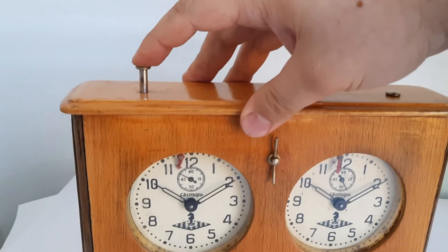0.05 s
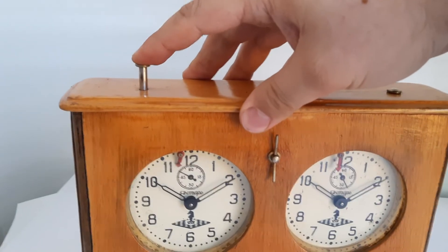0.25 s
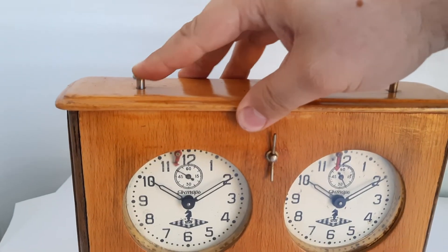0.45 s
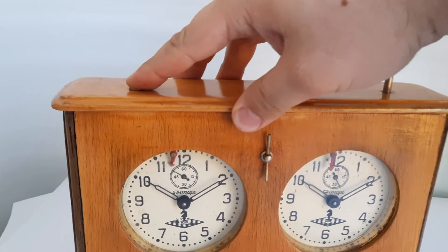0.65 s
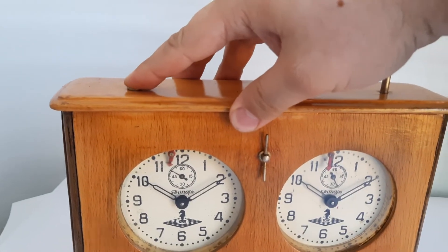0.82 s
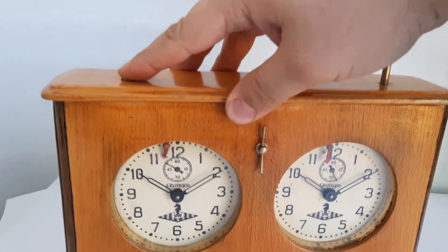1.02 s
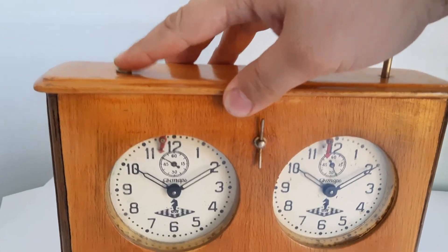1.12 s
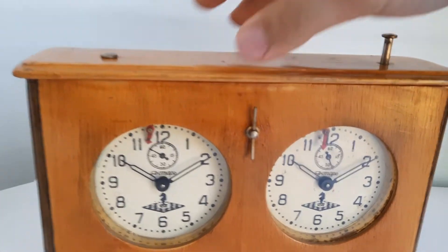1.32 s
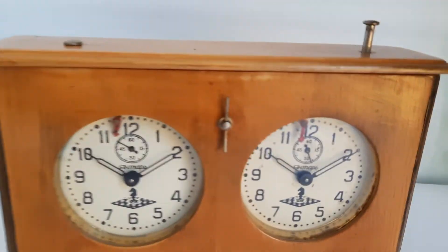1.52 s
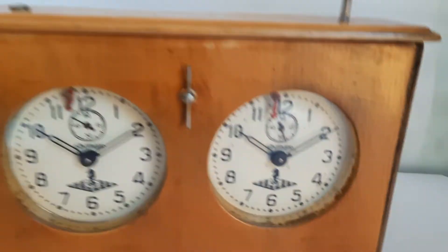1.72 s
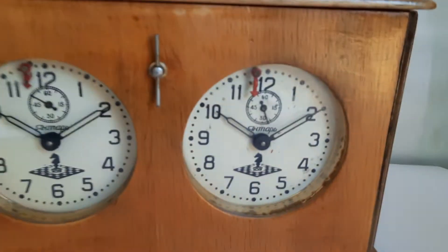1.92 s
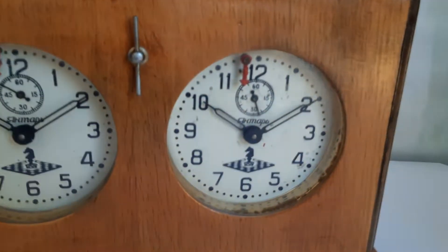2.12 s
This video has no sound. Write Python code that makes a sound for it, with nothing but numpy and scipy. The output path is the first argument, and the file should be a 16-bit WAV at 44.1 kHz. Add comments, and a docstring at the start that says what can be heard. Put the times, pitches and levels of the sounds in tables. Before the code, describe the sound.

Sharp, squeaky clack of a mechanical chess clock being pressed, followed by quiet ticking.

```python
"""A wooden chess clock in a quiet room.

Close by, the plunger is pushed down: the lever's impacts excite the modes of the case, the stem squeaks
by stick-slip friction in its bush and bottoms out, and the table shudders. One movement stops and the
other's escapement starts ticking. Two hollow knocks arrive from farther off, mostly as reverberation,
over a low room rumble, a rustle, sliding fingers and soft handling bumps."""
import sys
import numpy as np
from scipy import signal
from scipy.fft import rfft, irfft, next_fast_len
from scipy.io import wavfile
from scipy.ndimage import uniform_filter1d

SR = 44100
rng = np.random.default_rng(int(sys.argv[2]) if len(sys.argv) > 2 else 0)


def generate_wav(signal):
    """Clip the signal to [-1, 1] and save it as 16-bit WAV at the path in sys.argv[1]."""
    frames = np.transpose(np.atleast_2d(signal))
    scaled = np.clip(frames, -1, 1) * 32767
    pcm = np.round(scaled).astype(np.int16)
    wavfile.write(sys.argv[1], SR, pcm)


N = 94815
T = np.arange(N) / SR
SIDES = np.array([[1], [-1]])  # left, right

# normal modes of the wooden case (frequency [Hz], relative level [dB], t60 [s])
CASE_MODES = [(432.4, 1, 0.062), (1162, 1.5, .16), (1278, 3, 0.048), (1400, 1.5, 0.028), (1782, -5, .07),
              (1942, -2, 0.072), (2282, -12, 0.13), (2680, 0, 0.041), (2917, 0, 0.078), (3256, 7, 0.019)]
# the near clock's bias toward the left channel (frequency [Hz], bias [dB])
CLOCK_BIAS = [(600, -1.5), (1300, 1), (2400, 9), (4400, -1.5), (8000, 1.5)]


def amp(db):
    """Amplitude ratio of a level in decibels."""
    return 10 ** (np.asarray(db) / 20)


def at_hz(points, hz):
    """Interpolation of (frequency [Hz], value) points on a logarithmic frequency axis."""
    freqs, values = np.array(points, float).T
    return np.interp(np.log(np.maximum(hz, 1)), np.log(freqs), values)


def envelope(points):
    """Amplitude envelope through (time [s], level [dB]) points."""
    return amp(np.interp(T, *np.array(points).T))


def colour(x, points, share=1):
    """Minimum-phase filter with the response (frequency [Hz], gain [dB]); share scales the decibels."""
    size = next_fast_len(x.shape[-1] + SR // 10, real=True)
    gain = amp(share * at_hz(points, np.fft.rfftfreq(size, 1 / SR)))
    cepstrum = irfft(np.log(gain), size)
    cepstrum[1:size // 2] *= 2  # folding onto positive time makes the filter causal
    cepstrum[size // 2 + 1:] = 0
    return irfft(rfft(x, size) * np.exp(rfft(cepstrum)), size)[..., :x.shape[-1]]


def pan(x, bias):
    """Level difference between channels: a positive bias raises the left and lowers the right."""
    return np.array([colour(x[0], bias, 0.44), colour(x[1], bias, -0.59)])


def soften(x, hz):
    """Second-order low-pass: a softer contact excites less treble."""
    return signal.sosfilt(signal.butter(2, min(hz, .45 * SR), fs=SR, output="sos"), x)


def unit(x):
    """Normalisation to a mean energy of 1 per channel."""
    return x / np.sqrt(np.mean(np.sum(x ** 2, axis=-1)))


def at_level(x, db):
    """Scaling that sets the RMS level of the loudest 10 ms."""
    power = np.mean(np.atleast_2d(x) ** 2, axis=0)
    return x * amp(db) / np.sqrt(uniform_filter1d(power, SR // 100).max())


def add(out, start_s, x):
    """Superposition of a sound from a given time on."""
    i = int(max(start_s, 0) * SR)
    out[:, i:i + x.shape[-1]] += x[..., :N - i]


def decay(t60):
    """One second of exponential decay, falling 60 dB in t60 seconds."""
    return np.exp(-np.log(1000) * T[:SR] / t60)


def drift(rate_hz):
    """Random fluctuation: straight lines between Gaussian values drawn at the given rate."""
    return np.interp(T * rate_hz, np.arange(N), rng.standard_normal(N))


def noise(size, coherent_below_hz=750):
    """Diffuse-field noise: the two channels are coherent in the bass, independent in the treble."""
    mid, side = rfft(rng.standard_normal((2, size)))
    coherence = 1 / (1 + (np.fft.rfftfreq(size, 1 / SR) / coherent_below_hz) ** 2)
    return irfft(mid * np.sqrt((1 + coherence) / 2) + SIDES * side * np.sqrt((1 - coherence) / 2), size)


def wavering_noise(spectrum, depth_db=1.5):
    """Coloured noise of RMS near 1 under random amplitude modulation."""
    return unit(colour(noise(N), spectrum)) * np.sqrt(N) * amp(depth_db * drift(rate_hz=14))


def narrowband_ring(hz, width_hz, t60):
    """Noise passed twice through one resonance gives a grainy, decaying ring."""
    b, a = signal.iirpeak(hz, hz / width_hz, SR)
    return signal.lfilter(b, a, signal.lfilter(b, a, noise(SR))) * decay(t60)


def modal_ring(modes, spread_rad=1.0):
    """Free vibration: a sum of damped sinusoids, each with a phase offset in each channel."""
    out = np.zeros((2, SR))
    for hz, db, t60 in modes:
        phase = 2 * np.pi * (hz * T[:SR] + rng.random()) + spread_rad * rng.standard_normal((2, 1))
        out += amp(db) * decay(t60) * np.sin(phase)
    return out


def impact(modes, crackle_t60, snap_db, modes_db):
    """Impulse response of struck wood: a snap, a short crackle and ringing modes."""
    snap = amp(snap_db) * (T[:SR] == 0)
    crackle = unit(noise(SR) * decay(crackle_t60))
    return snap + crackle + amp(modes_db) * unit(modal_ring(modes))


def diffuse_tail(t60s, bands=8):
    """Dense reflections merge into noise, each band decaying with its own reverberation time."""
    spectrum, hz = rfft(noise(SR)), np.fft.rfftfreq(SR, 1 / SR)
    centres = np.geomspace(100, 14000, bands)
    out = np.zeros((2, SR))
    for centre, weights in zip(centres, np.eye(bands)):
        band = irfft(spectrum * at_hz(list(zip(centres, weights)), hz), SR)
        out += band * decay(at_hz(t60s, centre))
    return out


def in_room(x, reverb_db):
    """Direct sound plus its convolution with the room's impulse response."""
    # reverberation time of the room (frequency [Hz], t60 [s])
    t60s = [(200, 0.63), (1000, 0.44), (4000, 0.33), (12000, 0.36)]
    response = unit(diffuse_tail(t60s) * (1 - decay(0.027)))
    return x + amp(reverb_db) * signal.fftconvolve(x, response, axes=1)[:, :N]


def room_rumble():
    """Ambient noise with most of its energy in the bass."""
    # spectrum of the room's air (frequency [Hz], relative level [dB])
    spectrum = [(18, -41), (30, -23.5), (45, 7), (90, 0), (170, -10.5), (330, -6.5), (600, -17),
                (1000, -13.5), (1500, -47.5), (3000, -28), (5400, -38), (9500, -40), (12500, -33),
                (15500, -38)]
    return amp(-66.5) * wavering_noise(spectrum)


def rustle():
    """Low-frequency noise under a slow envelope is heard as a soft rustle."""
    # course of the rustle (time [s], level [dB])
    levels = [(0, -96), (.55, -58.5), (1.0, -82), (1.12, -64), (1.16, -61), (1.4, -62), (1.6, -68.5),
              (1.75, -65.5), (1.9, -60), (2.15, -54.5)]
    # its spectrum (frequency [Hz], relative level [dB])
    spectrum = [(60, 1.5), (130, 4.5), (190, -11.5), (340, 1), (600, -16), (1200, -19.5), (2500, -35),
                (4000, -39), (6000, -41.5), (15000, -52)]
    return envelope(levels) * wavering_noise(spectrum)


def sliding_fingers():
    """Sliding friction of fingers on wood radiates a faint hiss."""
    # course of the hiss (time [s], level [dB])
    levels = [(0, -84.5), (.5, -52), (.68, -69.5), (.85, -68), (1.1, -71), (1.3, -73.5), (1.5, -79),
              (1.65, -82.5), (2.15, -65)]
    # its spectrum (frequency [Hz], relative level [dB])
    spectrum = [(400, -16), (900, 3.5), (1700, 5.5), (2600, -10), (4200, -19), (5500, -28), (8000, -28.5),
                (10000, -33), (15000, -12)]
    return envelope(levels) * pan(wavering_noise(spectrum), CLOCK_BIAS)


def far_knocks(crossover_hz=2100, bass_onset=0.031, treble_onset=0.15):
    """Far off, reverberation dominates: the treble comes first, the bass swells and rings hollow."""
    # knocks (time [s], level [dB], swell time [s], cutoff [Hz], modes relative to echoes [dB])
    knocks = [(0.186, -33, 0.043, 14040, 2.5), (1.947, -43, 0.023, 2960, 0.5)]
    # modes of each knocked object (frequency [Hz], relative level [dB], t60 [s])
    mode_sets = [
        [(315.3, 4.5, 0.25), (356.4, 3, 0.28), (576, -5.5, 0.6), (666.6, 4, 0.32), (722, -11.5, 0.9),
         (866.4, 0, 0.38), (897, -1.5, 0.41), (1133, -12, 0.85), (1745, 2, 0.21), (2337, -10.5, 0.35),
         (2730, -4.5, 0.33), (3450, -10, 0.34), (3520, -12, 0.22), (3950, -10, .27)],
        [(256.1, -1.5, 0.49), (507, -1, 0.36), (632, -0.5, 0.29), (980, 11, 0.13)],
    ]
    # spectrum of the echoes (frequency [Hz], gain [dB])
    spectrum = [(80, -9), (190, -9.5), (300, 5.5), (480, -0.5), (700, -0.5), (1050, 2.5), (1400, -13.5),
                (1800, -6.5), (3500, -15.5), (5000, -16.5), (8000, -20.5), (9700, -28), (11500, -18),
                (16000, -15.5)]
    # their reverberation time (frequency [Hz], t60 [s])
    t60s = [(200, 0.46), (1000, 0.39), (3000, 0.48), (12000, 0.2)]
    out = np.zeros((2, N))
    for (s, db, swell_s, cutoff_hz, modes_db), modes in zip(knocks, mode_sets):
        pending = np.exp(-(T[:SR] / swell_s) ** 2)
        bass_swell = 1 - (1 - bass_onset) * pending  # onset: the share that arrives at once
        treble_swell = 1 - (1 - treble_onset) * pending
        echoes = soften(colour(diffuse_tail(t60s), spectrum), cutoff_hz)
        bass = soften(soften(echoes, crossover_hz)[:, ::-1], crossover_hz)[:, ::-1]  # zero phase
        body = unit(bass * bass_swell + (echoes - bass) * treble_swell)
        hollow = unit(modal_ring(modes, spread_rad=0.88) * bass_swell)
        add(out, s, at_level(body + amp(modes_db) * hollow, db))
    return out


def hand_bumps():
    """Soft contact of the hand on the case excites mainly low frequencies."""
    # nudges (time [s], level [dB])
    bumps = [(0.392, -35), (0.485, -33), (0.556, -44.5), (1.166, -63), (1.694, -62), (1.75, -56)]
    # their spectrum (frequency [Hz], gain [dB])
    spectrum = [(40, 3), (100, -2.5), (200, -10), (400, -5), (600, -18.5), (1200, -31), (4000, -53.5)]
    out = np.zeros((2, N))
    for s, db in bumps:
        add(out, s, at_level(colour(noise(SR) * decay(t60=0.11), spectrum), db))
    return out


def table_thuds(rise_s=0.024):
    """The table shudders under the hand as a damped low-frequency oscillator."""
    # thuds (time [s], level [dB], frequency [Hz], t60 [s])
    thuds = [(0.23, -45.5, 61.4, 1), (0.387, -32, 54.4, 0.14), (0.479, -33, 42.6, 0.12),
             (0.538, -36, 43.3, 0.17), (1.002, -53.5, 54.8, 0.15), (1.149, -58.5, 64.6, 0.22),
             (1.61, -60, 50, 0.23), (1.689, -52.5, 67.3, 0.083), (1.89, -57.5, 77, .3),
             (2.042, -48, 50.3, 0.13)]
    out, t = np.zeros((2, N)), T[:SR]
    rise = 1 - np.exp(-t / rise_s)
    for s, db, hz, t60 in thuds:
        add(out, s, at_level(np.sin(2 * np.pi * hz * t) * decay(t60) * rise, db))
    return out


def ringing_works(rise_s=0.039):
    """Resonances in the clockwork build up and ring on faintly."""
    # resonances (time [s], level [dB], frequency [Hz], resonator bandwidth [Hz], t60 [s])
    resonances = [(0.499, -64.5, 4230, 900, 0.49), (1.219, -79, 3980, 300, 0.81)]
    out = np.zeros((2, N))
    rise = 1 - np.exp(-T[:SR] / rise_s)
    for s, db, hz, width_hz, t60 in resonances:
        add(out, s, at_level(narrowband_ring(hz, width_hz, t60) * rise, db))
    return out


def escapement(rise_s=0.002, unlock_lead_s=0.046, spring_damping_s=0.016):
    """Two impacts a beat: unlocking sets a spring buzzing; the tooth's drop damps it and rings the case."""
    # beats of the running movement (time [s], level [dB], contact cutoff [Hz])
    beats = [(0.607, -49, 3980), (0.915, -55.5, 3240), (1.208, -53.5, 4970), (1.5154, -58.5, 3500),
             (1.8088, -56.5, 5030), (2.1157, -58.5, 3480)]
    # spectrum of a tick (frequency [Hz], gain [dB])
    spectrum = [(300, -15), (900, 0), (1200, 2), (2000, 3), (3100, 6), (4000, -4.5), (5800, -13),
                (9000, -24.5), (15000, -16.5)]
    # last tick of the movement that stops (time [s], level [dB])
    last_tick = [(0.0852, -52), (0.0848, -62)]
    # the modes it excites (frequency [Hz], relative level [dB], t60 [s])
    last_modes = [(1190, 4, 0.13), (2103, 4.5, 0.071), (2300, 1.5, 0.084), (2680, 5, 0.039)]
    out, t = np.zeros((2, N)), T[:SR]
    rise = 1 - .7 * np.exp(-t / rise_s)
    damping = np.exp(-np.maximum(t - unlock_lead_s, 0) / spring_damping_s)

    def tick(modes=CASE_MODES, crackle_t60=0.1, snap_db=-23, modes_db=-9):
        """A light impact radiated by the case."""
        return colour(impact(modes, crackle_t60, snap_db, modes_db) * rise, spectrum)

    for s, db, cutoff_hz in beats:
        add(out, s, at_level(soften(tick(), cutoff_hz), db))
        unlock = at_level(tick(), db=-74.5)
        spring = at_level(narrowband_ring(hz=3274, width_hz=73, t60=0.47) * damping, db=-71)
        add(out, s - unlock_lead_s, unlock + spring)
    for s, db in last_tick:
        add(out, s, at_level(tick(last_modes, snap_db=-10, modes_db=0.5), db))
    return in_room(out, reverb_db=-13.5)


def stem_squeak(jitter=0.01, left_lag_s=0.00043, slip_decay_cycles=0.48, release_db_per_s=519):
    """Stick-slip friction of the stem in its bush gives two harmonics and a puff of rasp at each slip."""
    # course of the squeak (time [s], pitch [Hz], fundamental [dB], octave [dB], rasp [dB])
    course = [(0.384, 591, -61, -64, -72.5), (0.404, 599.3, -43.5, -45.5, -66.5),
              (0.415, 567.5, -29.5, -38.5, -70.5), (0.422, 568.4, -28.5, -34, -62.5),
              (0.434, 577.5, -38.5, -29.5, -37.5), (0.447, 573, -31.5, -32.5, -32.5),
              (0.459, 556.7, -34, -49.5, -40), (0.471, 562, -36, -69, -43.5),
              (0.490, 568.8, -41.5, -44.5, -48.5)]
    # spectrum of the rasp (frequency [Hz], relative level [dB])
    spectrum = [(120, -16.5), (300, 0), (900, -10), (1300, -3), (1520, 11), (1900, -1.5), (3300, -6.5),
                (4500, 4.5), (5600, -3), (6400, -18.5), (7300, -2), (8400, -6.5), (9500, -28.5),
                (12500, -14.5), (16000, -24.5)]
    times, hz, *levels = np.array(course).T
    gate = amp(-release_db_per_s * np.maximum(T - times[-1], 0)) * (T > times[0])
    fundamental_gain, octave_gain, rasp_gain = (amp(np.interp(T, times, db)) * gate for db in levels)
    pitch = np.interp(T, times, hz) * (1 + jitter * drift(rate_hz=300))
    cycles = np.cumsum(pitch) / SR
    fundamental = fundamental_gain * np.sin(2 * np.pi * (cycles - SIDES * pitch * left_lag_s / 2))
    octave = octave_gain * np.sin(2 * np.pi * 2 * cycles)
    slips = noise(N) * np.exp(-(cycles % 1) / slip_decay_cycles)
    rasp = rasp_gain * unit(colour(slips, spectrum)) * np.sqrt(N)
    return in_room(np.sqrt(2) * (fundamental + octave) + rasp, reverb_db=-26)


def plunger():
    """Impacts excite the case's modes as the lever clacks over and the plunger bottoms out and rattles."""
    # blows on the case (time [s], level [dB], contact cutoff [Hz], crackle t60 [s])
    clacks = [(0.3816, -26.5, 8200, 0.032), (0.3864, -32, 5960, 0.17), (0.4790, -37.5, 3500, .08),
              (0.4880, -30, 4660, 0.071), (0.5069, -31.5, 2270, 0.024), (0.51, -33.5, 1400, 0.11),
              (0.524, -48, 1780, 0.083)]
    # their spectrum (frequency [Hz], gain [dB])
    spectrum = [(100, -1), (250, 5), (480, -2.5), (900, -1.5), (1350, 2), (2200, -6.5), (3200, 1.5),
                (4200, -6.5), (7000, -12), (9500, -23.5), (12000, -8), (16000, -11.5)]
    out = np.zeros((2, N))
    for s, db, cutoff_hz, t60 in clacks:
        clack = colour(impact(CASE_MODES, t60, snap_db=-4.5, modes_db=-9), spectrum)
        add(out, s, at_level(soften(clack, cutoff_hz), db))
    return in_room(out, reverb_db=-13)


def scene():
    """Superposition of the near clock and the room around it."""
    clock = pan(plunger() + escapement(), CLOCK_BIAS) + ringing_works() + stem_squeak()
    handling = table_thuds() + hand_bumps()
    return clock + handling + far_knocks() + room_rumble() + rustle() + sliding_fingers()


def record(dry, low_cut_hz=29, high_cut_hz=15850):
    """A band-limited microphone whose two ports each have their own frequency response."""
    # the ports' bias toward the left channel (frequency [Hz], bias [dB])
    port_bias = [(60, -1), (300, -0.5), (700, -4), (1300, 3.5), (2400, 5), (4400, 3.5), (5600, -2.5),
                 (7600, -14), (10000, -2), (15000, 0.5)]
    high_pass = signal.butter(2, low_cut_hz, "high", fs=SR, output="sos")
    low_pass = signal.ellip(10, .2, 80, high_cut_hz, fs=SR, output="sos")
    return signal.sosfilt(low_pass, signal.sosfilt(high_pass, pan(dry, port_bias)))


dry = scene()
out = record(dry)
generate_wav(out)
```